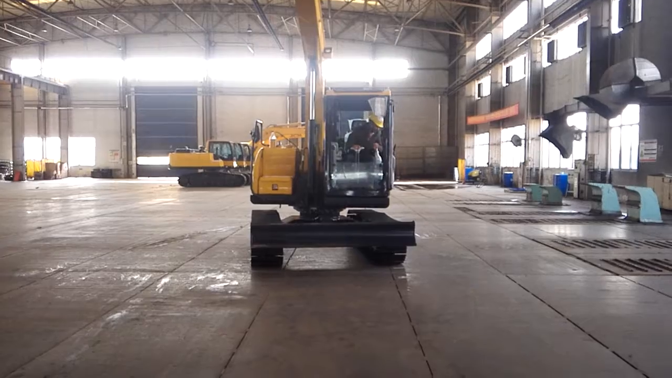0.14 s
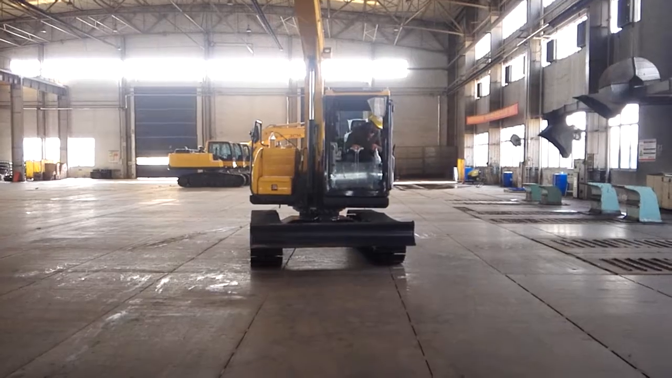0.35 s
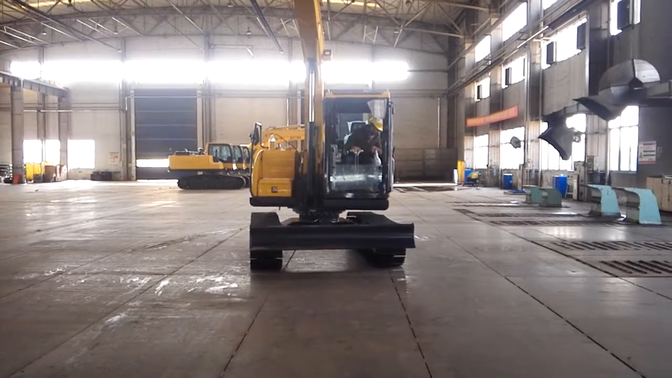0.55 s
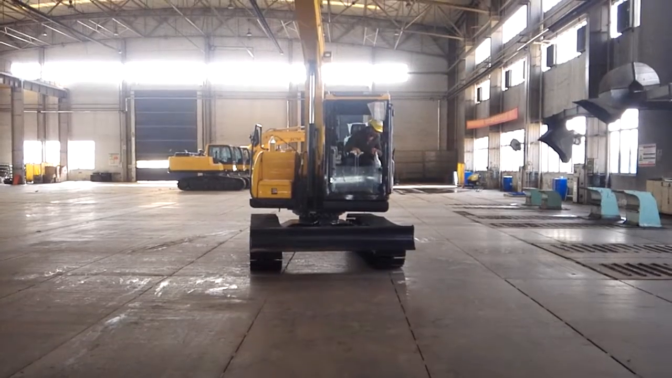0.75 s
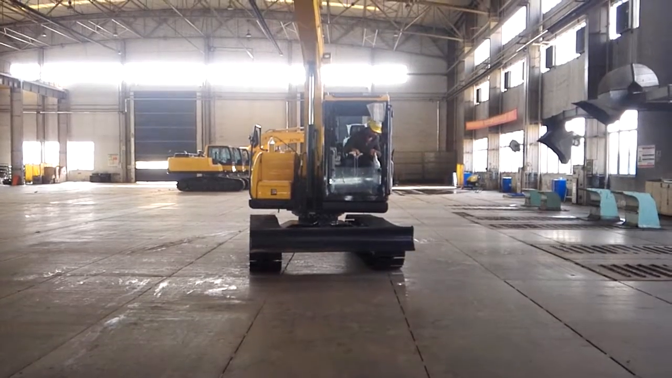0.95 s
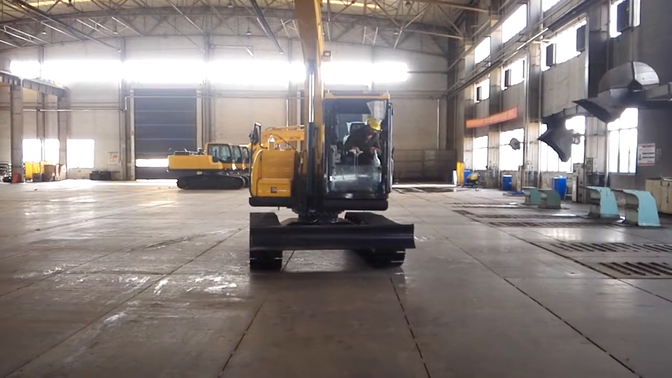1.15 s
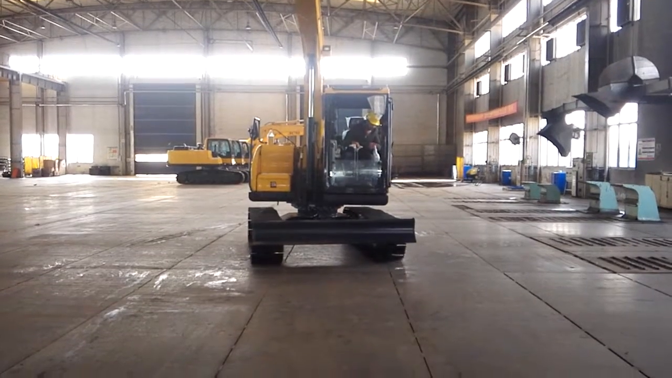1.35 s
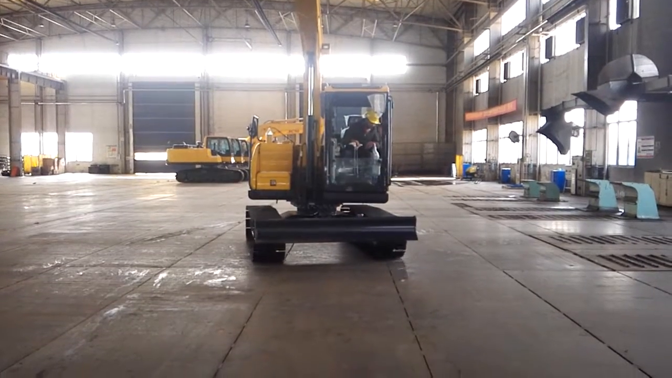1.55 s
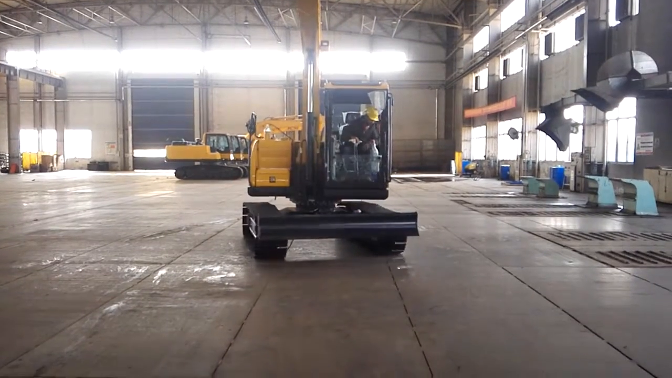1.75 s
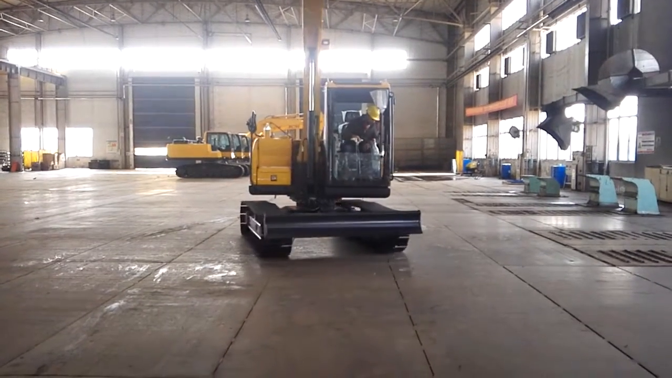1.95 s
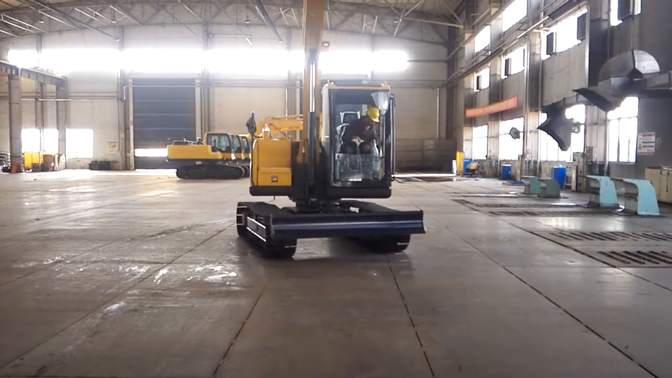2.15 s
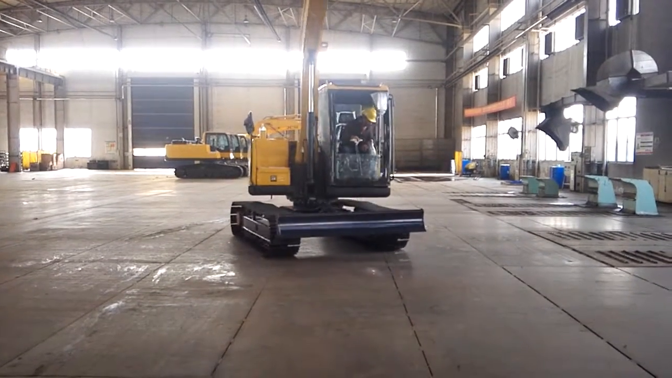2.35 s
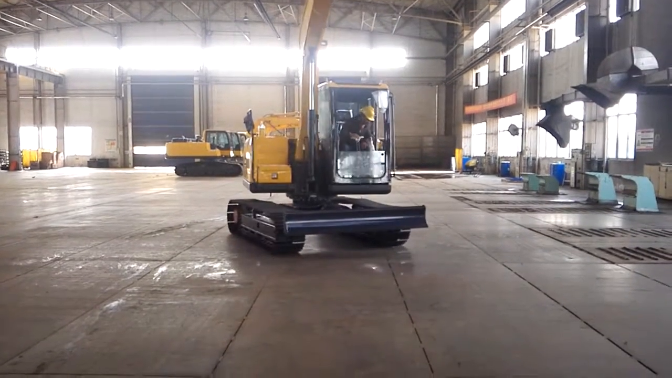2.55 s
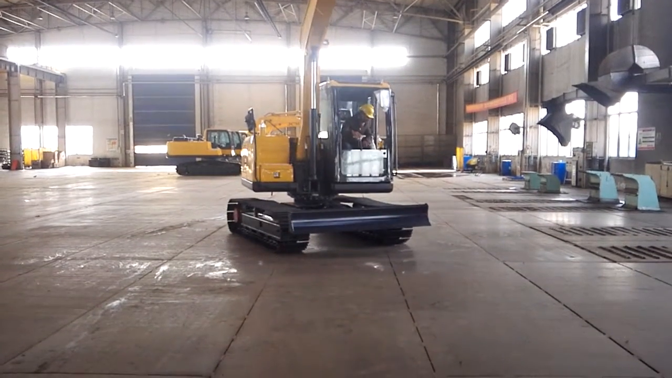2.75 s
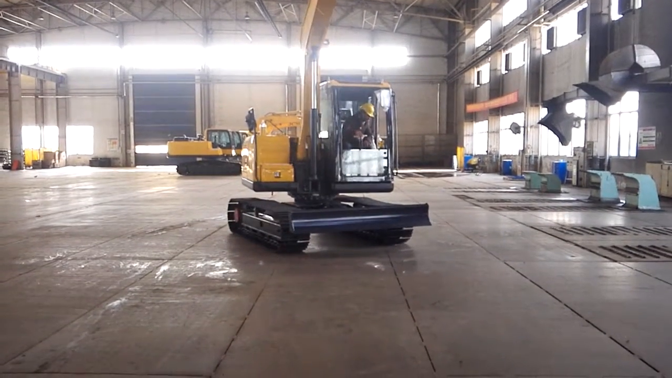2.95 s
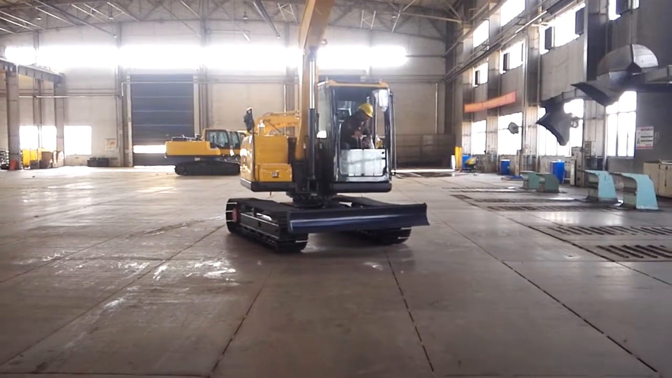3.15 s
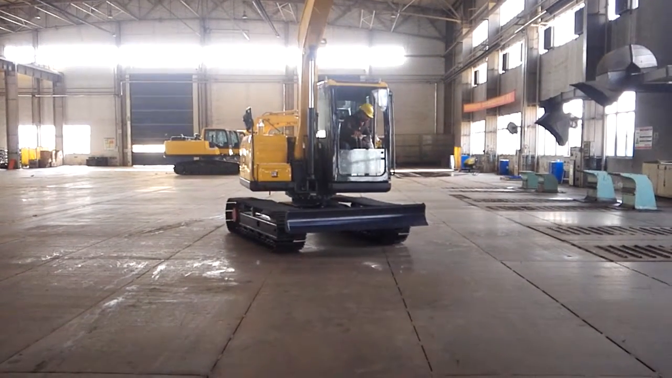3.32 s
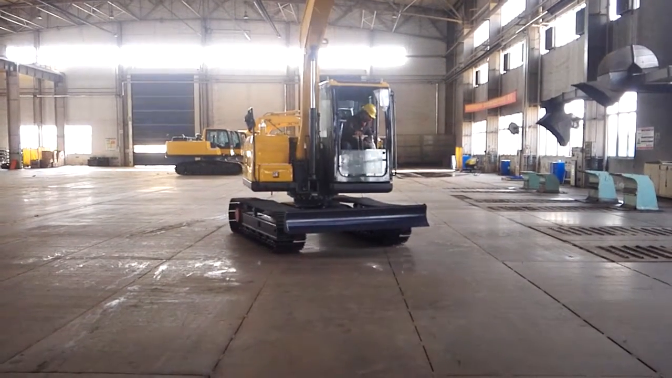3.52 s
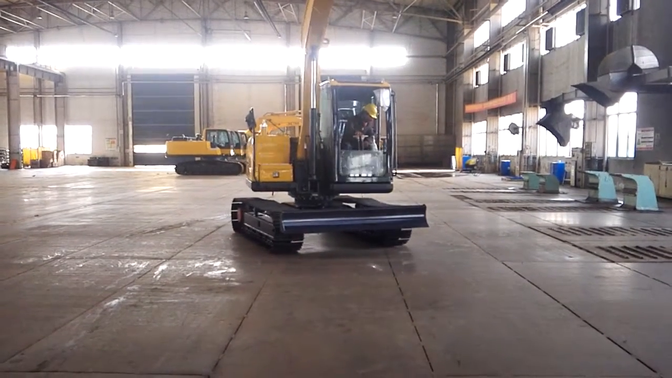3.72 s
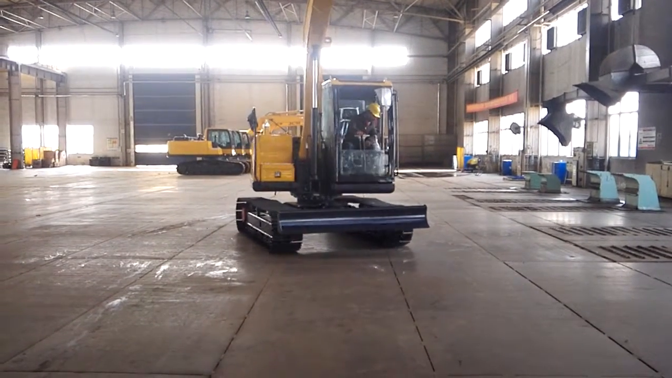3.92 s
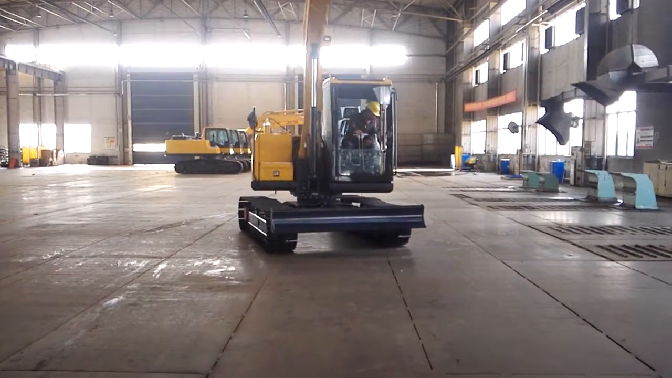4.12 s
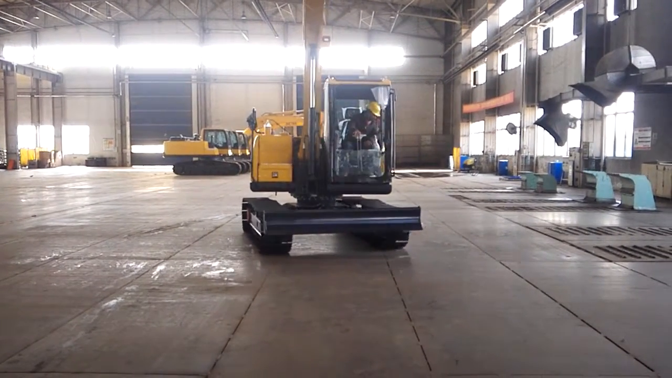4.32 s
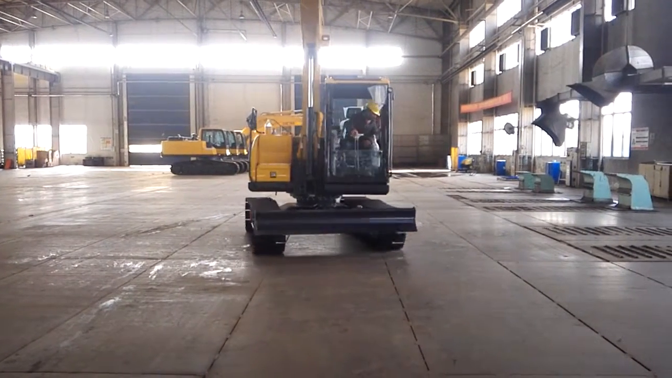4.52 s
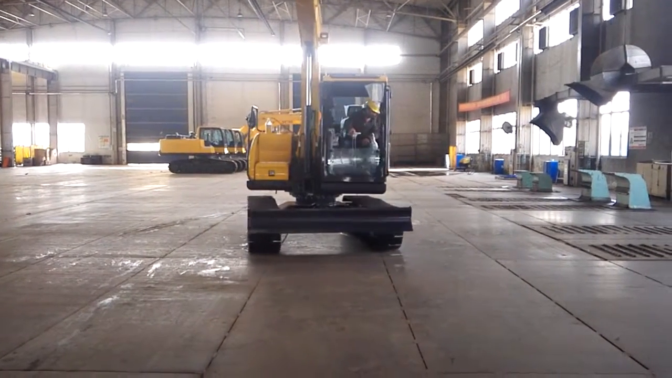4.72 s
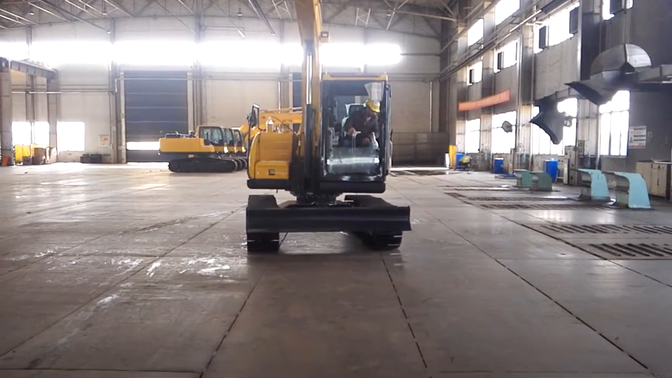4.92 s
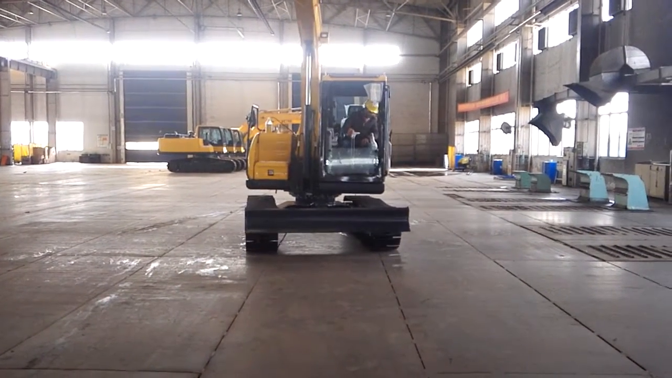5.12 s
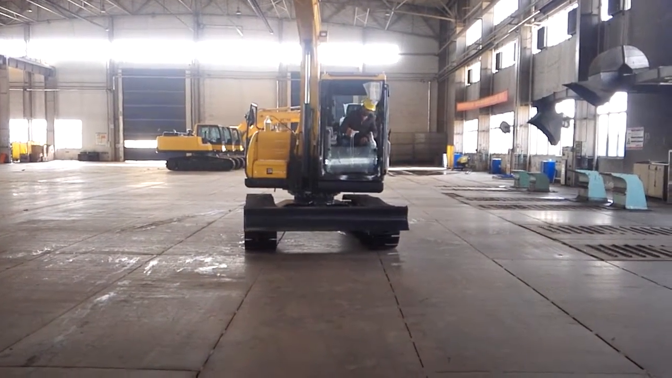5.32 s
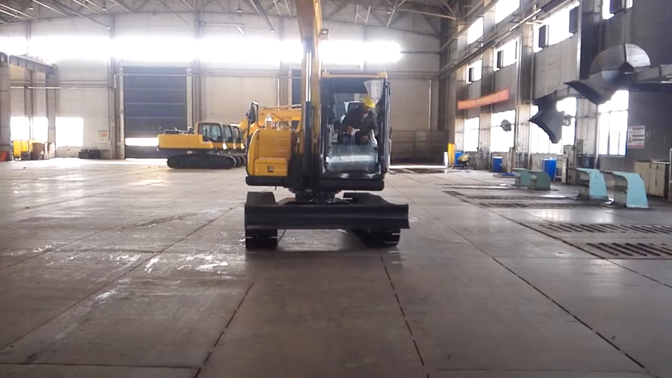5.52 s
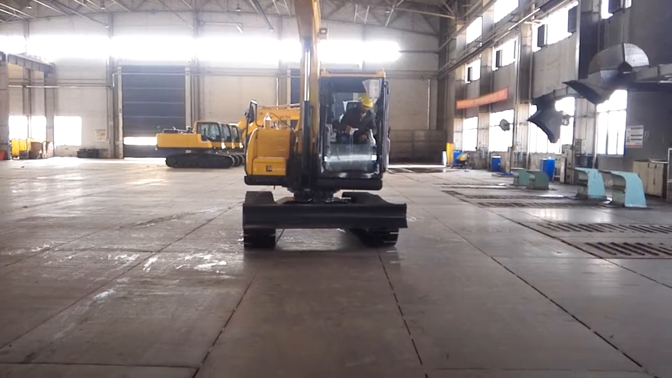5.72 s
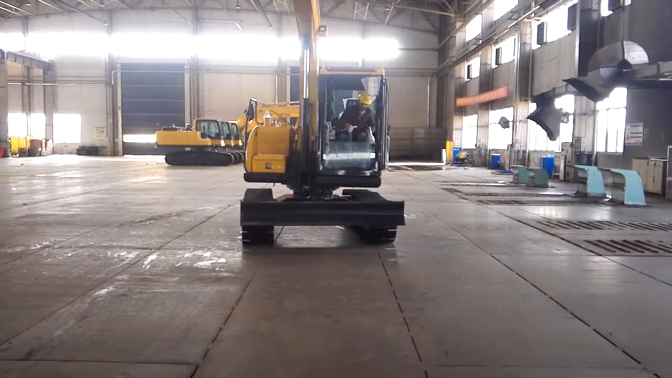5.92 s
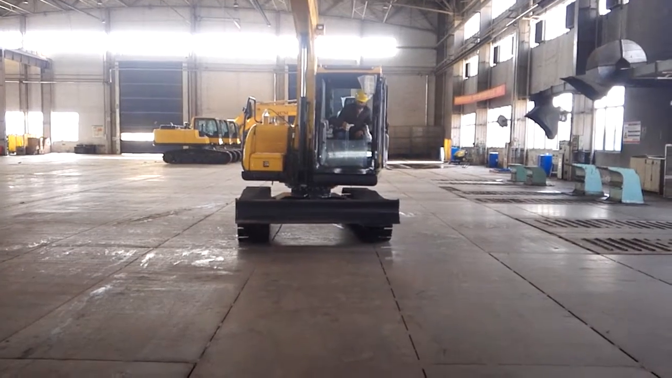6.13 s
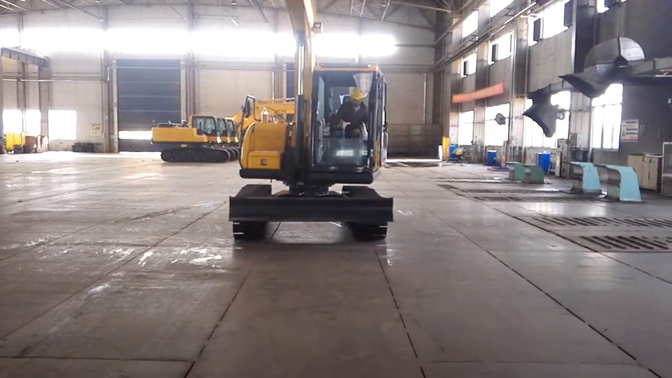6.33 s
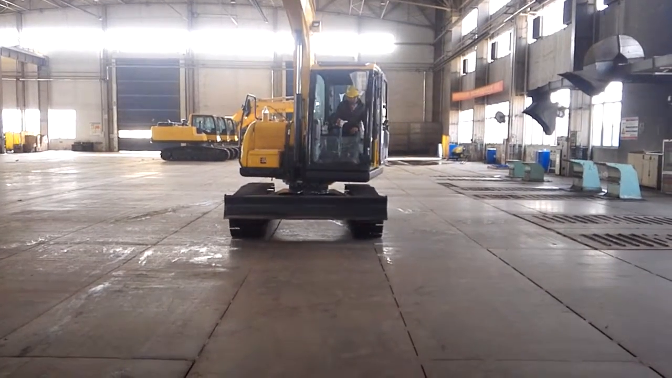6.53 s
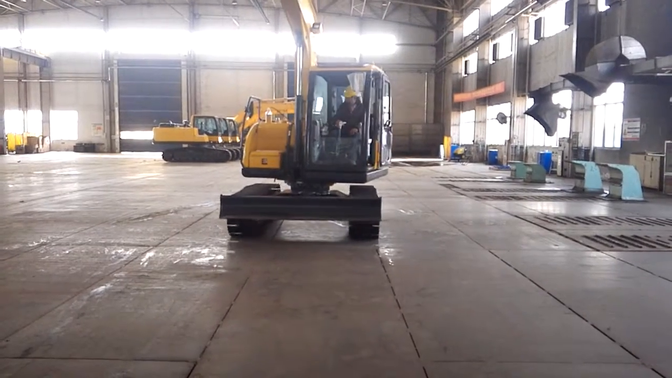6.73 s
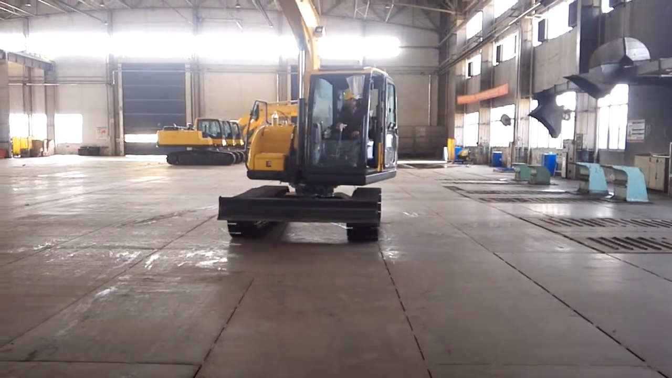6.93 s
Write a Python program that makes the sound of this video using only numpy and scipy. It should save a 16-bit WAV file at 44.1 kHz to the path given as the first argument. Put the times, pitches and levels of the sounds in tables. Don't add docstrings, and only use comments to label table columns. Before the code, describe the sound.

Heard across the floor through two spaced microphones: unsteady diesel rumble and steady grit under steel tracks, then a burst of clanks and scrapes as the excavator pivots. After a short lull, harder, distorted metallic blows thud into the concrete. They thin out as the throttle closes, leaving long hall ringing over a softer engine, then light scraping and loose track links ticking and knocking.

```python
import sys
import numpy as np
from scipy import signal
from scipy.fft import rfft, irfft, next_fast_len
from scipy.io import wavfile
from scipy.ndimage import uniform_filter1d, map_coordinates

SR = 44100
rng = np.random.default_rng(int(sys.argv[2]) if len(sys.argv) > 2 else 0)


def file_out(sig):
    cols = np.atleast_2d(sig).T
    lim = np.clip(cols, -1, 1)
    pcm = np.round(lim * 32767).astype(np.int16)
    wavfile.write(sys.argv[1], SR, pcm)


def gain_from_db(level_db):
    decades = np.asarray(level_db, float) / 20
    return 10 ** decades


N = 307287

# f/Hz, density/dB per Hz
FRAME = [(88, -45), (150, -20.5), (257, -3), (372, -26.5), (483, -6.5), (779, -3), (910, -4.5), (1240, 2.5),
         (1860, -1.5), (2600, -13.5), (3380, -29.5), (5720, -120)]
# f/Hz, density/dB per Hz
FLAT = [(20, 0), (20000, 0)]


def unit(x):
    return x / np.sqrt(np.mean(x ** 2) + 1e-20)


def along(points, hz):
    f, v = np.transpose(points)
    return np.interp(np.log(hz + 1), np.log(f + 1), v)


def curves(rows):
    s, *cols = np.transpose(rows)
    return [np.interp(np.arange(N) / SR, s, c) for c in cols]


def wobble(rate):
    knots = rng.standard_normal(int(N * rate / SR) + 4)
    return map_coordinates(knots, [np.arange(N) * rate / SR])


def filtered(x, response):
    m = next_fast_len(N + SR // 2)
    return irfft(rfft(x, m) * response(np.fft.rfftfreq(m, 1 / SR)), m)[..., :N]


def noise(grain_db=0):
    white = rng.standard_normal((2, N))
    return unit(white * gain_from_db(grain_db * white[::-1, ::-1]))


def spread(pair, spectrum):
    # f/Hz, left-right correlation
    alike = [(40, .995), (160, 0.96), (250, 0.99), (400, 0.31), (900, 0.27), (2230, 0.14), (5490, 0.1),
             (13600, 0.05)]
    turn = lambda hz: np.arccos(np.clip(along(alike, hz), -1, 1)) / 2
    gain = lambda hz: gain_from_db(along(spectrum, hz))
    scale = np.sqrt(np.mean(gain(np.linspace(0, SR / 2, num=8192)) ** 2))
    mid, side = filtered(pair, lambda hz: gain(hz) / scale * [np.cos(turn(hz)), np.sin(turn(hz))])
    return np.array([mid + side, mid - side])


def room(x, decay, size):
    hz, t, z = signal.stft(rng.standard_normal((2, size)), SR, nperseg=256)
    dying = gain_from_db(-60 * t / along(decay, hz)[:, None])
    tail = signal.istft(z * dying, SR, nperseg=256)[1]
    tail = tail / np.linalg.norm(tail[0])
    return signal.fftconvolve(x.mean(axis=0)[None], tail, axes=1)[:, :N]


def mottled(x):
    # f/Hz, depth/dB
    mottle = [(300, 0), (1500, 0), (2300, 1.5), (2700, 5.5), (3100, -0.6), (4000, 2), (7000, 0), (9000, 6),
              (12000, 4)]
    hz, _, z = signal.stft(x, SR, nperseg=1024)
    field = uniform_filter1d(rng.standard_normal(z.shape[1:]), size=3, axis=0)
    field = uniform_filter1d(field, size=4, axis=1)
    gain = gain_from_db(along(mottle, hz)[:, None] * unit(field))
    gain = gain / np.sqrt(np.mean(gain ** 2, axis=1, keepdims=True))
    return signal.istft(z * gain, SR, nperseg=1024)[1][:, :N]


def frame_modes(f):
    # f/Hz, width/Hz, level/dB
    modes = [(149, 75, -6), (270, 80, -13), (499, 120, -5), (756, 113, 7), (1113, 120, 4),
             (1437, 240, -3.5)]
    return sum((-1) ** k * gain_from_db(db) * 1j * f * width / (centre ** 2 - f * f + 1j * f * width)
               for k, (centre, width, db) in enumerate(modes))


def throttle():
    # t/s, block level/dB
    load = [(0, -36), (1.2, -36.5), (1.42, -27.5), (2.3, -24.5), (2.75, -28.5), (3.0, -29.5), (3.3, -34.5),
            (3.43, -26), (3.7, -34), (3.86, -23), (4.05, -36), (4.5, -35.5), (5.06, -40.5), (5.8, -45),
            (6.35, -38.5), (6.97, -39.5)]
    block_db, = curves(load)
    ease_s, ease_lasts_s = 3.27, 2
    eased = np.clip((np.arange(N) / SR - ease_s) / ease_lasts_s, 0, 1)
    exhaust_db = -42.5 + 0.27 * (block_db + 35) - 13 * np.sqrt(eased)
    drone_db = -37.5 + 0.55 * (block_db + 36) - 7 * eased
    return exhaust_db, drone_db, block_db


def engine():
    # f/Hz, rms level re exhaust/dB
    firing_tones = [(43.1, -9.5), (78, -9), (113, -3.5), (146, -2.5)]
    # f/Hz, density/dB per Hz
    exhaust = [(20, -51.5), (31, -25.5), (38, -2.5), (48, -3), (60, -5), (80, -3.5), (110, -6.5),
               (140, -28), (240, -120)]
    # f/Hz, density/dB per Hz
    cabin = [(53, -23), (90, -10.5), (112, 0.5), (150, -2), (183, -4), (215, -0.5), (252, -6.5),
             (285, -3.5), (450, -13), (580, -33.5), (990, -120)]
    # f/Hz, density/dB per Hz
    block_colour = [(210, -16.5), (350, -2), (471, -3.5), (706, -0.5), (845, -2.5), (1050, -4), (1300, -4),
                    (1800, -9.5), (3000, -29), (3900, -48), (6600, -120)]
    exhaust_db, drone_db, block_db = throttle()
    t = np.arange(N) / SR
    tones = sum(gain_from_db(db + 0.76 * wobble(5.5)) * np.sin(2 * np.pi * hz * t + hz / 55 * wobble(3.7))
                for hz, db in firing_tones)
    firing = 1 + 0.048 * np.sin(2 * np.pi * firing_tones[0][0] * t + 1.3 * wobble(5.5))
    low = gain_from_db(exhaust_db - 4) * spread(noise(), exhaust) + gain_from_db(exhaust_db + 3.0) * tones
    drone = gain_from_db(drone_db + 0.32 * wobble(6.4)) * spread(noise(), cabin)
    block = gain_from_db(block_db - 1.0 + 1.0 * wobble(14)) * spread(firing * noise(), block_colour)
    return low + drone + block


def dragging():
    # start t/s, rise/s, let-go t/s, level/dB, fall/dB per s
    drags = [
        (-0.5, .1, 3.38, -42.5, 200),
        (.85, 0.29, 1.3, -39, 30),
        (1.2, .17, 2.56, -29.5, 45),
        (3.42, 0.14, 3.6, -25.5, 21.5),
        (5.2, .6, 6, -52.5, 30),
        (5.84, 0.09, 7.08, -43.5, 30),
    ]
    first_touch_db, rest_db = -11.5, -56.5
    t = np.arange(N) / SR
    levels = []
    for start, rise, let_go, db, fall in drags:
        swell = first_touch_db * np.clip(1 - (t - start) / rise, 0, 1)
        dying = fall * np.maximum(t - let_go, 0)
        levels.append(np.where(t < start, -120, db + swell - dying))
    level_db = np.maximum(np.max(levels, axis=0), rest_db)
    frame_db = -8.5 + 0.33 * (level_db + 41.5)
    return level_db, frame_db


def grind():
    # f/Hz, density/dB per Hz
    grit = [(1060, -24), (1800, -0.5), (2350, 1.5), (2790, -2.5), (3490, -1.5), (5040, -3.5), (9360, -16),
            (11400, -23.5), (13300, -24), (14000, -33)]
    level_db, frame_db = dragging()
    slips = gain_from_db(level_db + 0.82 * wobble(12) + .8 * wobble(45))
    return slips * (spread(noise(grain_db=3.0), grit) + gain_from_db(frame_db) * spread(noise(), FRAME))


def rollers():
    # t/s, peak level/dB, t60/s
    drops = [(0.8, -24.5, 0.25), (4.159, -17.5, 0.092), (6.036, -28.5, 0.091), (6.21, -37, 0.066),
             (6.297, -29.5, 0.074), (6.374, -28, 0.095), (6.483, -31.5, 0.055), (6.536, -27, 0.1),
             (6.63, -32, 0.09), (6.69, -34.5, 0.13), (6.779, -36.5, 0.1), (6.846, -28, 0.13),
             (6.923, -22.5, 0.074)]
    knocks, t = np.zeros(N + SR), np.arange(SR // 2) / SR
    for s, db, t60 in drops:
        knocks[round(s * SR):][:len(t)] += gain_from_db(db + 10.5 - 60 * t / t60) * (1 - np.exp(-t / 0.0034))
    return filtered(spread(knocks[:N] * noise(grain_db=2.0), FLAT), frame_modes)


def bites():
    # t/s, peak level/dB, slip/s, clunk re peak/dB
    turn_out = [(1.184, -26.5, .012, -15), (1.2026, -22, 0.044, -19.5), (1.26, -16.5, 0.031, -41),
                (1.311, -20, 0.034, -25), (1.403, -20.5, .032, -18.5), (1.437, -13.5, .028, -11.5),
                (1.5523, -17, 0.011, -15), (1.6196, -8.5, 0.033, -24), (1.6612, -9.5, .022, -18),
                (1.7194, -19.5, .061, -0.5), (1.7896, -15, 0.015, -22), (1.901, -22.5, 0.054, 0),
                (1.9444, -21, .028, -19), (2.022, -25.5, 0.061, -9), (2.064, -16, .032, -3),
                (2.214, -16.5, 0.03, -22.5), (2.348, -2.5, 0.024, -21.5), (2.4994, -26, 0.029, -14.5),
                (2.5594, -30.5, 0.0062, -12.5)]
    # t/s, peak level/dB, slip/s, clunk re peak/dB
    turn_back = [(3.3265, -26.5, 0.1, -11.5), (3.3906, -1.5, .017, -20), (3.4724, -4.5, 0.024, -26),
                 (3.5805, 3, 0.03, -11.5), (3.6494, -11.5, 0.065, -8.5), (3.8038, -5, 0.027, -27),
                 (3.8388, -7, 0.043, -14), (3.952, -5, 0.024, -16), (3.996, 0, 0.022, -10),
                 (4.1145, -12, 0.0068, -24), (4.26, -10, .02, -25), (4.3009, -6.5, 0.037, -6),
                 (4.405, -12, 0.019, -26), (4.46, -15.5, 0.027, -16.5), (4.663, -22.5, 0.014, -16.5)]
    # t/s, peak level/dB, slip/s, clunk re peak/dB
    crawl = [(.2494, -51, .032, -8), (.79, -38, 0.039, -4), (.8434, -38.5, 0.071, 4),
             (5.8144, -46, 0.035, 0), (5.8481, -27, 0.0099, -15), (5.8616, -28.5, 0.025, -20),
             (6.1194, -39.5, 0.014, -6), (6.2048, -36, .042, -8), (6.2794, -31.5, 0.038, -6),
             (6.552, -38, .028, -6), (6.5864, -33.5, 0.058, -7), (6.7624, -40.5, 0.019, -13),
             (6.8174, -37, .026, -10)]
    # frame re peak/dB, its growth/dB per dB of peak, edge re peak/dB, its growth/dB per dB
    manoeuvres = [
        (-13, -0.36, -19, 1.2),
        (-17.5, -0.36, -14.5, 0.86),
        (-26, -0.3, -34, -0.4),
    ]
    return [(s, db, frame + frame_grows * db, edge + edge_grows * db, slip, clunk_db)
            for rows, (frame, frame_grows, edge, edge_grows) in zip((turn_out, turn_back, crawl), manoeuvres)
            for s, db, slip, clunk_db in rows]


def thuds():
    # f/Hz, density/dB per Hz
    slab = [(60, -29), (100, -6.5), (140, 1), (220, -1.5), (330, -7), (480, -18), (800, -120)]
    late_s, rise_s, t60_s = 0.0062, .015, 0.25
    level, t = np.zeros(N + SR), np.arange(SR // 2) / SR
    for s, db, *_, clunk_db in bites():
        peak_db = db - 20.5 + 0.12 * clunk_db
        thud = gain_from_db(peak_db - 60 * t / t60_s) * (1 - np.exp(-t / rise_s))
        level[round((s + late_s) * SR):][:len(t)] += thud
    return level[:N] * unit(spread(noise(), slab))


def shoes():
    # f/Hz, density/dB per Hz
    shoe_steel = [(1060, -36), (1800, -12.5), (2110, -3.5), (2940, -3.5), (3430, -1.5), (3720, -1.5),
                  (4850, -0.5), (5240, 0), (9030, -11.5), (11000, -27), (14300, -59.5), (22000, -120)]
    # f/Hz, density/dB per Hz
    sharp = [(4710, -16.5), (8000, -4), (10000, -3.5), (11500, -14.5), (12500, -6.5), (14000, -17)]
    steel, frame, edge, clunk = np.zeros((4, N + SR))
    t = np.arange(SR // 2) / SR
    for s, db, frame_db, edge_db, slip, clunk_db in bites():
        after = np.maximum(t - slip, 0)
        bite = gain_from_db(db - 8.5) * (1 - np.exp(-t / 0.0005))
        at = slice(round(s * SR), round(s * SR) + len(t))
        steel[at] += bite * gain_from_db(-60 * after / 0.19)
        frame[at] += bite * gain_from_db(frame_db + 6.5 - 60 * after / 0.14)
        snap = 1 + 1.0 * np.exp(-t / 0.0042)
        edge[at] += bite * gain_from_db(edge_db + 4.5 - 60 * t / 0.26 - 60 * after / .12) * snap
        late = 1 - np.exp(-t / 0.01)
        clunk[at] += bite * gain_from_db(clunk_db + 32.5 - 60 * t / 0.056) * late
    rattle = mottled(noise(grain_db=3))
    layers = ((steel, shoe_steel), (frame, FRAME), (edge, sharp))
    blows = sum(level[:N] * spread(rattle, colour) for level, colour in layers)
    blows = blows + filtered(spread(clunk[:N] * noise(grain_db=4.5), FLAT), frame_modes)
    lag, lead = .016, .005
    return filtered(blows, lambda hz: np.exp(-2j * np.pi * (1000 * lag * np.log(1 + hz / 150) - lead * hz)))


def scene():
    # f/Hz, t60/s
    near = [(300, 0.54), (2000, 0.64), (6000, 0.6), (12000, 0.32)]
    # f/Hz, t60/s
    hall = [(200, 6.1), (1000, 5.47), (2200, 2.94), (4000, 1.52), (8000, 1.11), (13000, 1)]
    blows = shoes() + rollers()
    far = filtered(blows, lambda hz: gain_from_db(along([(400, -10.5), (800, -6.0), (1500, 0.5), (5000, -0.5)], hz)))
    echoes = gain_from_db(-10) * room(blows, near, size=SR // 2) + gain_from_db(-6.5) * room(far, hall, size=5 * SR // 2)
    return blows + mottled(spread(echoes, FLAT) + grind()) + engine() + thuds()


def low_pass(x):
    return signal.sosfilt(signal.butter(12, 14050, fs=SR, output="sos"), x)


def record(dry):
    # f/Hz, left over right/dB
    lean = [(60, -1), (180, 0.0), (520, 0.5), (1550, 0.5), (4590, -0.5), (13600, -3.5)]
    apart_s = 0.000315

    def ports(hz):
        level = gain_from_db(np.outer([.5, -.5], along(lean, hz)))
        phase = np.pi * np.outer([1, -1], np.maximum(hz - 900, 0)) * apart_s
        return level * np.exp(1j * phase)

    x = filtered(dry, ports)
    ceiling = np.where(x > 0, .99, .86)
    x = x / (1 + np.abs(x / ceiling) ** 12) ** (1 / 12)
    return low_pass(x)


dry = scene()
out = record(dry)
file_out(out)
```